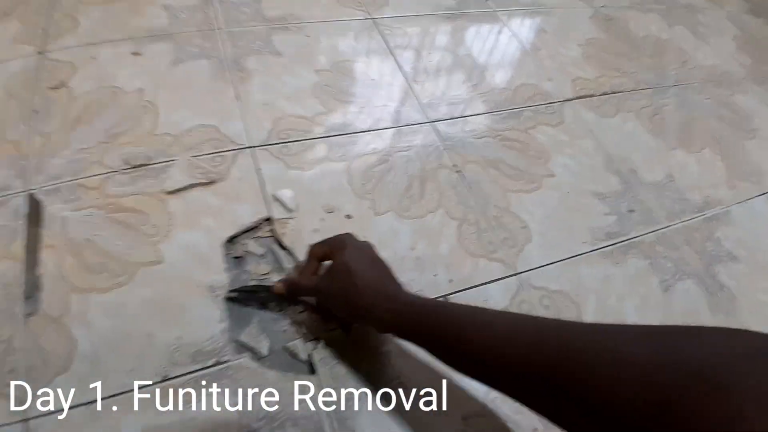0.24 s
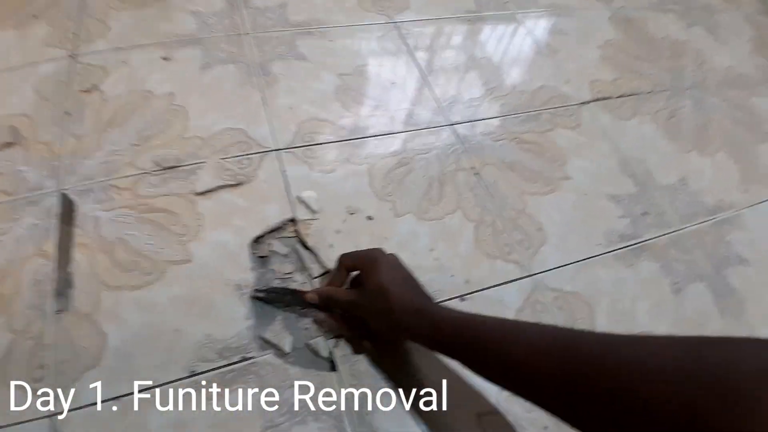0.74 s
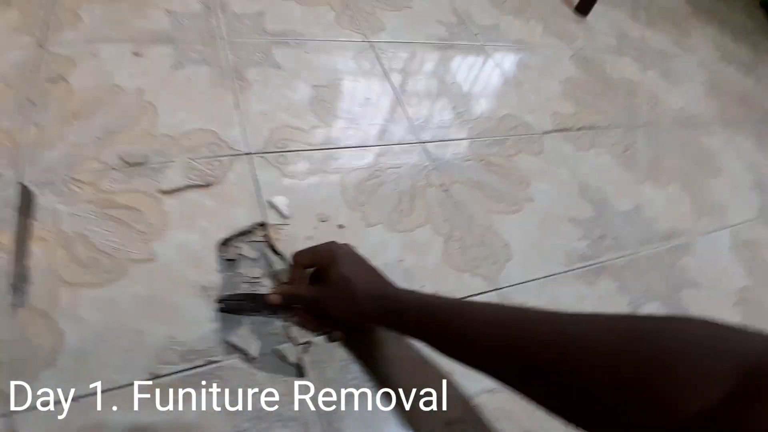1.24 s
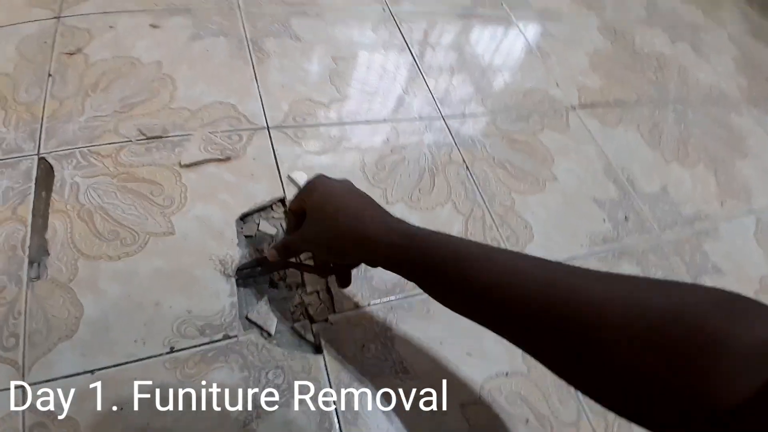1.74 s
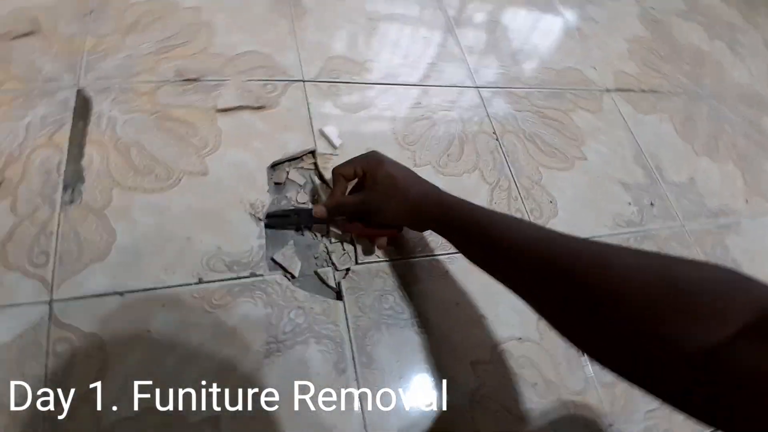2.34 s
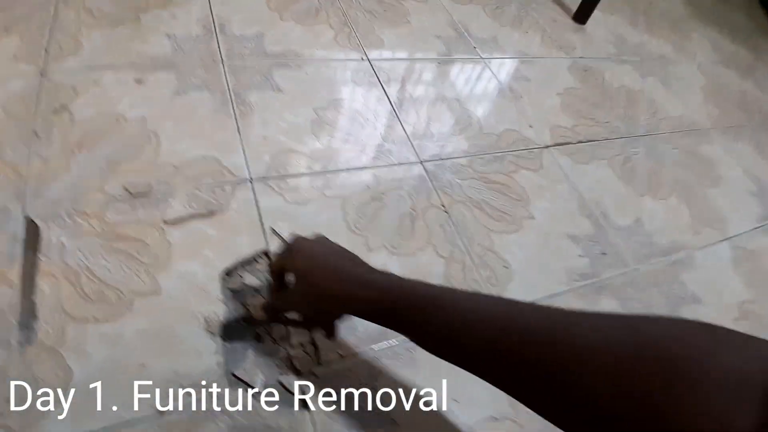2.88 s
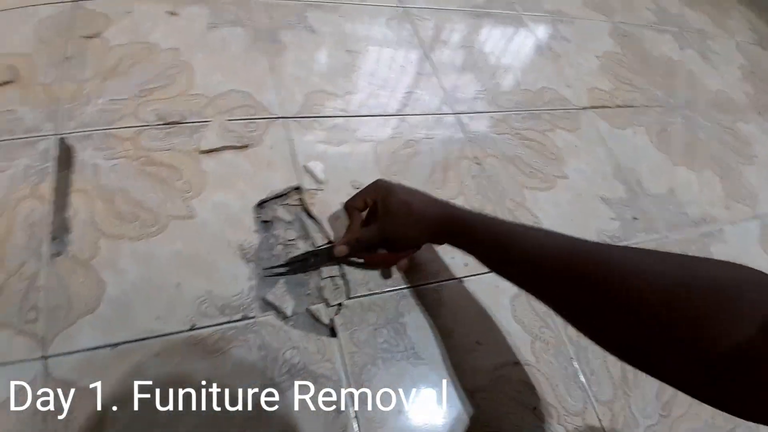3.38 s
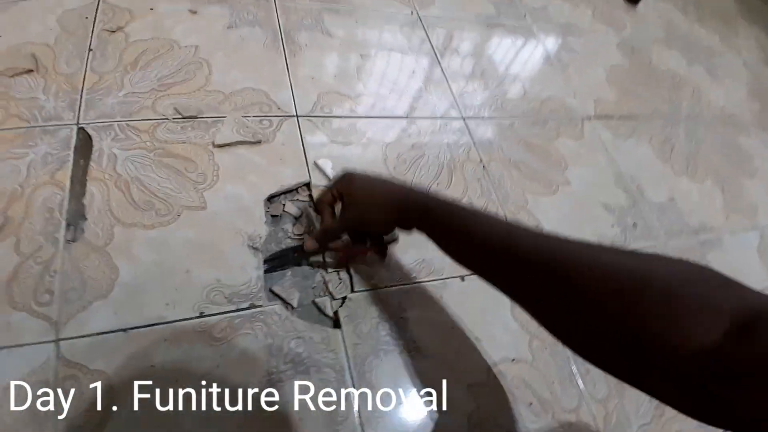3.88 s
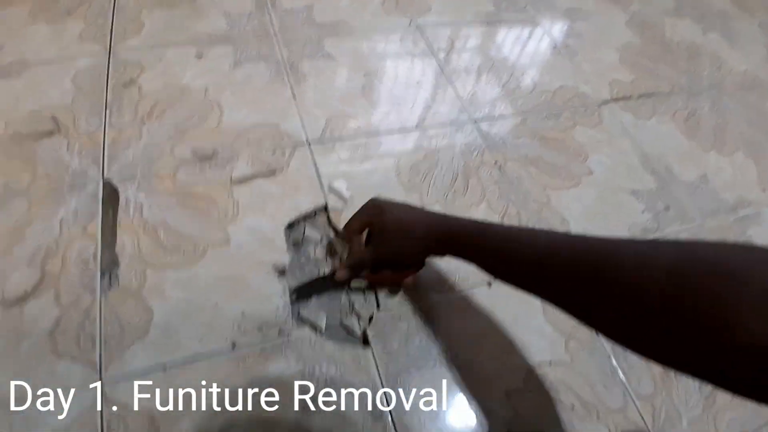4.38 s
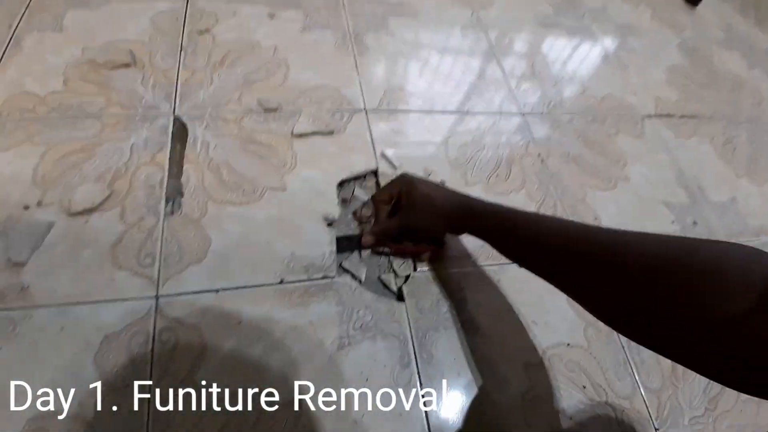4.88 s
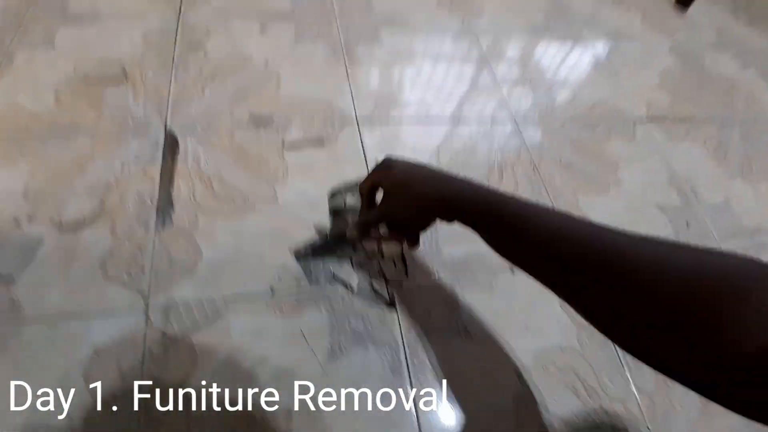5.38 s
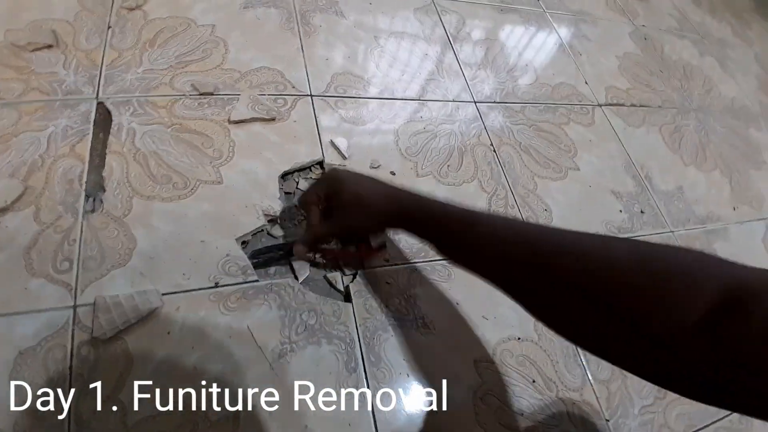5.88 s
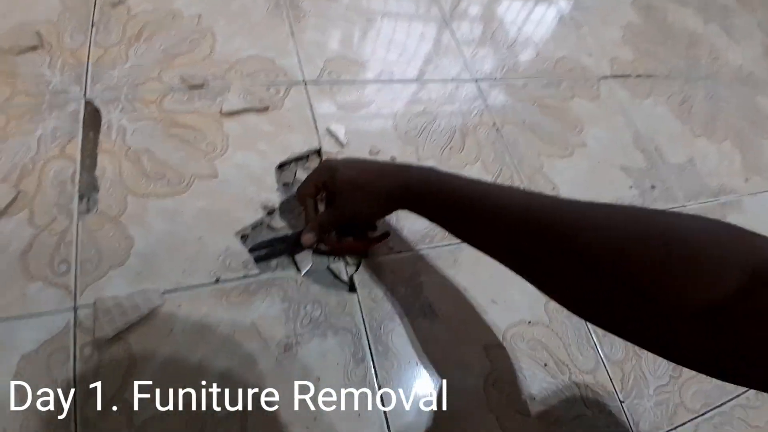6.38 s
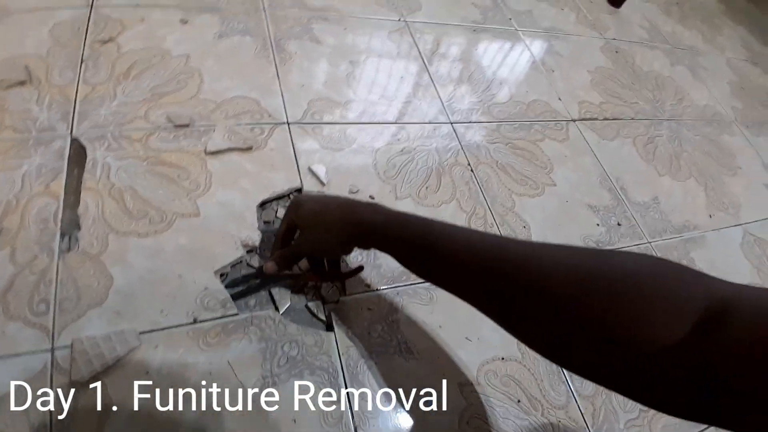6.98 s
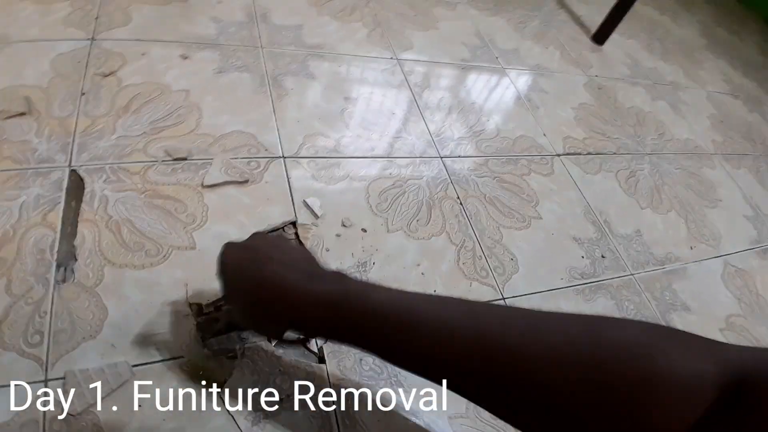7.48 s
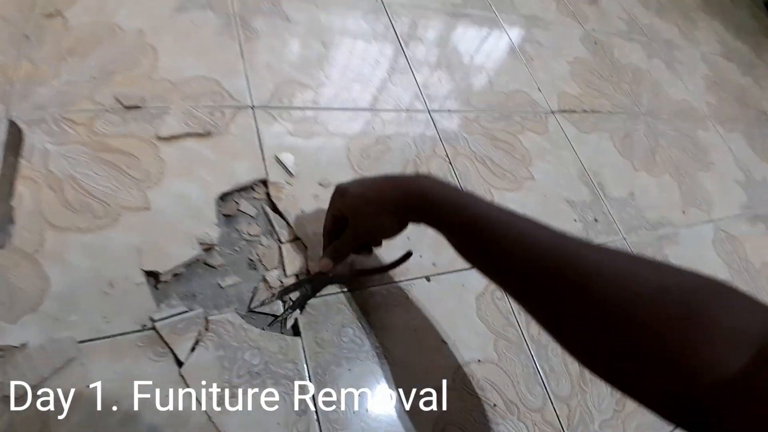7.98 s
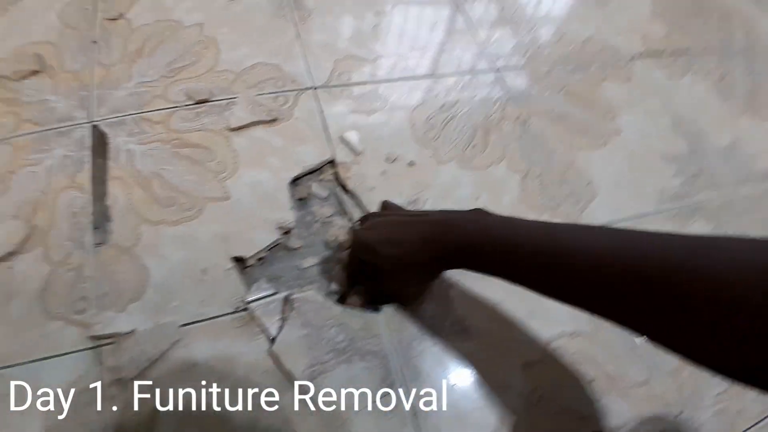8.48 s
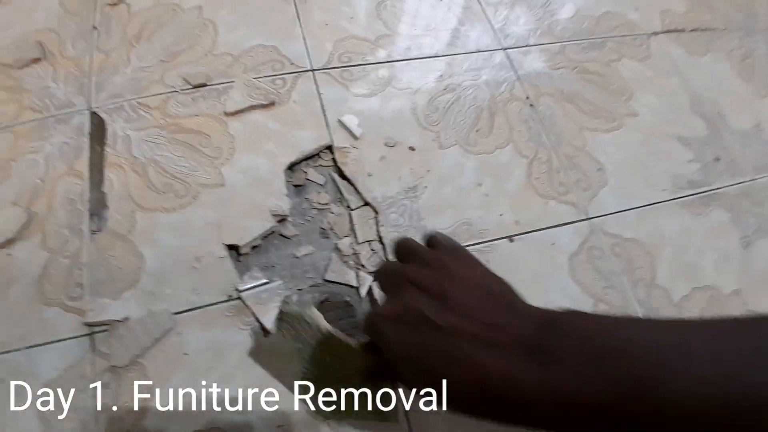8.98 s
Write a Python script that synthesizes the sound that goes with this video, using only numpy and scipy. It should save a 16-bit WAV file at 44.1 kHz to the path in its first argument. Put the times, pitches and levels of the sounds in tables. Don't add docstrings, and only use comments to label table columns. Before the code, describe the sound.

Sharp blows crack hollow-sounding floor tile indoors, gritty scrapes leading into the hits, loose steel ringing briefly, then broken pieces clacking and sliding.

```python
import sys
import numpy as np
from scipy import signal
from scipy.fft import rfft, irfft, next_fast_len
from scipy.io import wavfile

SR = 44100
rng = np.random.default_rng(int(sys.argv[2]) if len(sys.argv) > 2 else 0)


def transcribe(u):
    v = np.clip(np.atleast_2d(u).T, -1, 1)
    q = np.round(v * 32767).astype(np.int16)
    wavfile.write(sys.argv[1], SR, q)


def nominal_scale(level):
    x = np.asarray(level, float) / 20
    return 10 ** x


N = 407484
TOP_HZ = 15380

# frequency in Hz, level in dB, t60 in seconds.
HOLLOW_MODES = [(76.04, -18.5, 0.35), (170, -15, 0.056), (188, 0.5, 0.11), (228.72, -8, 0.01),
                (280.87, 5, 0.073), (345.4, 6.5, 0.0412), (397.4, -0.5, 0.14), (483.8, 7, 0.0349),
                (705, -9.5, 0.032), (809, -7.5, 0.098)]


def at_hz(points, hz):
    point_hz, value = np.transpose(points)
    return np.interp(np.log(hz), np.log(point_hz), value)


def band(x, low_hz, high_hz):
    return signal.sosfilt(signal.butter(2, [low_hz, high_hz], "band", fs=SR, output="sos"), x + 1e-18)


def rms_one(x):
    return x / np.sqrt(np.mean(x ** 2) + 1e-20)


def ring(clicks, hz, t60_s):
    radius, w = nominal_scale(-60 / (t60_s * SR)), 2 * np.pi * hz / SR
    return signal.lfilter([0, np.sin(w)], [1, -2 * radius * np.cos(w), radius ** 2], clicks + 1e-18)


def strike(start_s, level_db, modes, spread_db):
    at = np.round(start_s * SR).astype(int)
    luck = rng.standard_normal((len(at), len(modes)))
    out = np.zeros(N)
    for k, (hz, mode_db, t60_s) in enumerate(modes):
        clicks = np.zeros(N)
        clicks[at] = nominal_scale(level_db + mode_db + spread_db * luck[:, k])
        out += ring(clicks, hz, t60_s)
    return out


def grains(per_s, spread_db):
    sizes = nominal_scale(spread_db * np.minimum(rng.exponential(1, N), 5)) * rng.choice([-1, 1], N)
    return rms_one(sizes * (rng.random(N) < per_s / SR))


def wander(low_hz, high_hz, depth_db):
    return nominal_scale(depth_db * rms_one(band(rng.standard_normal(N), low_hz, high_hz)))


def swells(start_s, level_db, rise_s, fall_s, curve, hold_s=0):
    t = np.arange(0, N, 32)[:, None] / SR
    before = np.maximum(start_s - t, 0) / np.abs(rise_s)
    after = np.maximum(t - start_s - hold_s, 0) / np.abs(fall_s)
    gain = nominal_scale(level_db - 20 * (before + after) ** curve).sum(axis=1)
    return np.interp(np.arange(N) / SR, t[:, 0], gain)


def bank(size, gain):
    # frequency in Hz, left-right correlation.
    likeness = [(60, 0.41), (150, 0.9993), (300, 0.859), (600, 0.061), (1200, 0.063), (4000, 0.32),
                (15000, 0.28)]
    out, edges_hz = 0, 28 * 2 ** np.arange(0, 9.4, .4)
    white = rng.standard_normal((2, 2, size))
    for k, (low_hz, high_hz) in enumerate(zip(edges_hz, edges_hz[1:])):
        mid, side = band(white[k % 2], low_hz, high_hz)
        hz = np.sqrt(low_hz * high_hz)
        alike = at_hz(likeness, hz)
        out = out + gain(hz) * (np.sqrt(1 + alike) * mid + np.sqrt(1 - alike) * side * [[1], [-1]])
    return out


def background():
    # frequency in Hz, density in dB per Hz.
    floor = [(18, -39), (30, -14), (140, -2), (208, -9), (308, -7), (855, -22), (1330, -30), (2310, -26.5),
             (4000, -41.5), (6410, -40), (15600, -46)]
    # peak time in seconds, level in dB, seconds to rise 20 dB (sign ignored).
    booms = [(0.1, -52.5, -5.5), (0.59, -35, 0.68), (1.19, -42.5, 0.34), (1.745, -37, -0.23),
             (3.29, -32.5, .5), (4.01, -46, 0.04), (4.765, -27, 0.0029), (5.11, -14, -0.0118),
             (5.97, -47.5, 0.8), (6.92, -46.5, 0.15), (7.54, -21, 0.215), (8.67, -32.5, 0.27)]
    start_s, level_db, rise_s = np.transpose(booms)
    boom = rms_one(ring(rng.standard_normal(N), 76.0, 0.12))
    noise = nominal_scale(-59) * rms_one(bank(N, lambda hz: nominal_scale(at_hz(floor, hz))))
    return noise + swells(start_s, level_db - 6.0, rise_s, fall_s=0.319, curve=0.8203) * boom


def with_room_feed(x, room_db):
    return x * nominal_scale([[0], [room_db]])


def tool():
    # start in seconds, level in dB.
    hits = [
        (5.3205, -12.5),
        (5.3284, -23.5),
        (5.3987, -14),
        (5.408, -19),
        (5.442, -28),
    ]
    # frequency in Hz, level in dB, t60 in seconds.
    steel_modes = [(739.8, -4.5, 0.038), (2550, -16, .1), (4304, -7, 0.08), (4107, -13.5, .1),
                   (4222, 5, 0.096), (3764, -14.5, .05), (4590, -16.5, 0.055), (6000, -12.5, 0.05),
                   (7500, -14.5, 0.045), (10236, -10.5, 0.04), (11424, -20, 0.027)]
    # start in seconds, length in seconds, rms level in dB.
    jingles = [
        (0.95, 0.46, -54),
        (3.074, 0.19, -46.5),
        (3.19, 0.15, -48),
        (4.614, 0.36, -51.5),
        (5.63, 0.2327, -45.5),
    ]
    # frequency in Hz, level in dB, t60 in seconds.
    joint_modes = [(4730, -10, 0.021), (7824, -4, 0.039), (8500, -4, 0.039), (10200, -1.5, 0.0045),
                   (11380, -5, 0.0045), (12600, -5.5, 0.011), (13780, -6, .01), (15070, -7, .006)]
    start_s, level_db = np.transpose(hits)
    jingle_s, lasts_s, jingle_db = np.transpose(jingles)
    taps = grains(per_s=600, spread_db=2.0)
    jingle = np.zeros(N)
    for hz, db, t60_s in joint_modes:
        some_taps = taps * (rng.random(N) < .6)
        jingle += nominal_scale(db) * wander(9.1, 33, depth_db=4.0) * ring(some_taps, hz, t60_s)
    shaking = swells(jingle_s, jingle_db - 9.0, .02, .02, 0.963, lasts_s)
    rings = strike(start_s, level_db - 0.5, steel_modes, spread_db=1.5)
    return with_room_feed(rings + shaking * rms_one(jingle), -2)


def strokes():
    # end in seconds, grind in dB, seconds for the last 20 dB
    # (sign ignored), rumble and hiss in dB re grind.
    pushes = [
        (1.157, -39.5, 0.1045, 5, -1),
        (1.725, -25, -0.0368, 1.5, 0.5),
        (3.486, -17.5, -0.0243, 0, 4.5),
        (3.996, -26, 0.017, 7.5, -3),
        (4.742, -22, -0.035, 7, -10.5),
        (5.93, -35, 0.0943, 0.5, 3),
        (7.419, -24.5, 0.0252, 7.5, -5),
    ]
    # peak in seconds, grind in dB, seconds to fall 20 dB
    # (sign ignored), rumble and hiss in dB re grind.
    crumbles = [
        (0.545, -30, 0.0852, 3, -15.5),
        (0.901, -50, -0.01, 5, 0),
        (1.79, -31.5, 0.1629, 8.5, -15),
        (2.746, -35.5, 0.193, 0, -1),
        (2.946, -41, 0.2839, 4, -2.5),
        (4.033, -18, 0.213, -2.5, -5),
        (5.114, -24.5, 0.36, -1, -10),
        (7.47, -25.5, 0.2344, 10.5, 0),
        (7.75, -46, 0.4147, 5.5, -5.5),
        (8.315, -51, 1, 8.5, -2),
    ]
    # peak in seconds, grind in dB, seconds to rise and to fall 20 dB (signs ignored),
    # rumble in dB re grind.
    slides = [
        (0.086, -49.5, 5, -0.3033, -3),
        (0.475, -37, 0.2, 0.05, -1.5),
        (2.004, -28.5, -0.0776, 0.0543, -4),
        (2.408, -53, 0.32, -0.05, -9.5),
        (2.69, -56, 0.04, 0.11, 4),
        (3.981, -43.5, 0.2379, -0.24, 2),
        (6.922, -52.5, 0.0409, 0.1365, 15.5),
        (7.401, -44.5, 0.147, 0.1469, 15),
        (9.2, -42.5, 1.23, 4.5, -3.5),
    ]
    # start in seconds, length in seconds,
    # grind in dB, rumble and hiss in dB re grind.
    drags = [(0.442, 0.0515, -35.5, 5, 2.5), (1.153, 0.02677, -38.5, 2.5, 0.5), (1.65, 0.074, -55, 4.5, -5),
             (1.706, 0.028, -34.5, 5.5, 3.5), (2.716, 0.016, -46, 9.5, -6), (3.441, 0.041, -46.5, 7, 8),
             (5.895, 0.043, -49.5, 6.5, 3.5), (7.382, 0.019, -38, -10.5, 5), (9.188, .06, -48, 3, -13),
             (7.298, 0.018, -39, 10.5, -8.5), (1.976, 0.0293, -36.5, -2.5, -4.5),
             (2.384, 0.0417, -44.5, -3, -3.5), (2.735, 0.031, -39, 6.5, -3),
             (2.819, 0.0145, -43.5, 6.5, -5.5), (3.065, 0.0217, -45.5, 6, -1),
             (4.711, 0.0155, -50.5, 2.5, -1), (4.729, 0.009, -43.5, 3, -7.5),
             (8.296, 0.0112, -42, 10.5, -11.5), (8.34, 0.05, -45, 8, -9.5), (8.402, 0.0406, -42.5, 10, -10),
             (8.52, 0.0245, -43, 10, -13.5), (8.611, .02, -37, 5.5, 0), (8.645, 0.0203, -44.5, 3.5, 2.5),
             (8.699, 0.029, -42, 3, -0.5), (8.835, 0.051, -47.5, 9.5, 2), (8.933, 0.0224, -45, 8, -11.5),
             (9.032, .06, -49.5, 6.5, -4)]
    push_s, push_db, push_rise_s, push_rumble_db, push_hiss_db = np.transpose(pushes)
    crumble_s, crumble_db, crumble_fall_s, crumble_rumble_db, crumble_hiss_db = np.transpose(crumbles)
    slide_s, slide_db, slide_rise_s, slide_fall_s, slide_rumble_db = np.transpose(slides)
    drag_s, drag_lasts_s, drag_db, drag_rumble_db, drag_hiss_db = np.transpose(drags)
    offsets_db = [
        (0, 0, 0, 0),
        (push_rumble_db, crumble_rumble_db, slide_rumble_db, drag_rumble_db),
        (push_hiss_db, crumble_hiss_db, -4, drag_hiss_db),
    ]
    return [swells(push_s, push_db + push, push_rise_s, fall_s=0.003, curve=0.5182)
            + swells(crumble_s, crumble_db + crumble, 0.0361, crumble_fall_s, curve=1.046)
            + swells(slide_s, slide_db + slide, slide_rise_s, slide_fall_s, curve=1.046)
            + swells(drag_s, drag_db + drag, 0.0032, 0.004, 0.84, drag_lasts_s)
            for push, crumble, slide, drag in offsets_db]


def grinding():
    grind_gain, rumble_gain, hiss_gain = strokes()
    clumps = wander(18.7, 77, depth_db=2.5)
    grit = clumps * grains(per_s=4000, spread_db=3.0)
    pieces = np.zeros(N)
    for hz in np.geomspace(1400, 4500, 7):
        pieces += wander(14, 25, depth_db=1.5) * ring(grit, hz, 3.91 / hz)
    grind = rms_one(rms_one(band(grit, 1400, 3912)) + 1.2 * rms_one(pieces))
    shaken = rms_one(sum(nominal_scale(db) * ring(grit, hz, 0.43 * t60_s) for hz, db, t60_s in HOLLOW_MODES[2:8]))
    tumbling = rms_one(band(clumps * grains(per_s=1500, spread_db=2.5), 297.5, 1020.5))
    hiss = rms_one(band(clumps * grains(per_s=5700, spread_db=5.0), 6600, TOP_HZ))
    pressure = np.clip((20 * np.log10(grind_gain) + 48.32) / 26, .15, .95)
    rumble = pressure * shaken + np.sqrt(1 - pressure ** 2) * tumbling
    return with_room_feed(nominal_scale(-6.0) * (grind_gain * grind + rumble_gain * rumble + hiss_gain * hiss), -2.5)


def clinks(rows, t60_s):
    out, t = np.zeros(N), np.arange(SR // 5) / SR
    for start_s, level_db, hz in rows:
        start, t60 = round(start_s * SR), t60_s * (hz / 1000) ** .05
        chime = nominal_scale(level_db - 60 * t / t60) * np.sin(2 * np.pi * hz * t)
        out[start:start + len(t)] += chime[:N - start]
    return out


def shards():
    # start in seconds, level in dB, pitch in Hz.
    loose = [(.524, -14, 2750), (1.165, -35.5, 3446), (1.727, -13.5, 4660), (1.73, -10.5, 925),
             (3.44, -45.5, 4930), (3.49, -17.5, 3650), (3.512, -45, 3502), (4.002, -9.5, 2086),
             (4.01, -9, 4560), (4.03, -10, 4200), (4.08, -11, 4580), (4.095, -15, 4130),
             (4.065, -11.5, 2154), (4.09, -15, 2270), (4.04, -8, 2550), (4.055, -12, 4380),
             (4.745, -19, 1550), (4.746, -17.5, 2285), (4.748, -19.5, 998), (5.095, -14, 400),
             (1.162, -20, 289), (1.163, -27, 895), (3.492, -16, 792), (7.428, -13, 1047), (.53, -16.5, 279),
             (4.746, -38, 3106), (5.932, -20, 3735), (5.929, -30.5, 2650), (5.945, -17, 585.2),
             (5.949, -22.5, 3316), (5.95, -27, 1971), (6.833, -45, 3197), (6.889, -21, 598),
             (6.9, -35.5, 4440), (7.2, -27.5, 8000), (7.421, -17, 8500), (7.657, -14.5, 789.5),
             (7.797, -25, 756.3), (8.69, -23.5, 1765), (8.698, -36.5, 3800), (8.85, -30, 8690),
             (9.189, -44, 3000), (9.2, -35.5, 1969), (7.701, -12.5, 799), (7.767, -17, 866),
             (7.795, -25.5, 5980), (7.795, -26, 10140), (8.434, -24, 680), (8.515, -15, 891),
             (8.718, -26.5, 3826), (8.92, -23.5, 8900), (8.952, -19, 586), (9.001, -34.5, 616.3),
             (9.222, -27, 1500)]
    # start in
    # seconds, level in dB, pitch in Hz.
    close_rings = [(1.159, -26, 3500), (2.539, -49, 5923), (2.667, -45.5, 5020), (2.71, -39, 5480),
                   (2.948, -28, 3790), (2.95, -40, 7300), (2.96, -33, 1110), (7.657, -26.5, 4100),
                   (7.658, -30, 2820), (7.925, -35, 895.5), (5.321, -14.5, 4222), (5.33, -13, 4222),
                   (5.452, -27.5, 11300), (5.42, -30, 10100), (8.516, -17.5, 1530), (8.955, -26, 1606),
                   (8.584, -30.5, 800), (8.812, -35.5, 700), (2.05, -22, 380), (2.058, -27, 420),
                   (3.974, -32, 751.6), (5.399, -13.5, 4222), (5.409, -12, 4173), (5.417, -17, 4222),
                   (5.45, -23, 4340), (5.51, -23.5, 4200), (9.19, -34, 4600)]
    # start in seconds, level in dB, pitch in Hz.
    singing = [
        (7.98, -43, 3180),
        (8.04, -37, 3183),
        (8.07, -42, 3143),
        (8.13, -44.5, 3234),
        (8.2, -52.5, 3173),
    ]
    # start in seconds, level in dB, pitch in Hz.
    glaze_snaps = [(.581, -11, 6500), (.586, -22.5, 4000), (.647, -15, 5561), (1.771, -10, 3010),
                   (1.773, -23, 6000), (1.803, -21, 6000), (1.989, -32.5, 6965), (3.487, -6.5, 1120),
                   (3.488, -10, 2510), (3.488, -8, 4660), (3.488, -17, 9000), (3.886, -30.5, 5060),
                   (3.887, -37.5, 8500), (4.0, -12, 6000), (5.32, -14.5, 3000), (5.32, -20.5, 7000),
                   (5.329, -20, 6000), (5.399, -15.5, 4480), (7.953, -27.5, 5256), (8.036, -26.5, 6240),
                   (4.748, -17.5, 1802), (5.4, -14, 7500), (5.408, -17, 6500), (5.415, -20, 8000),
                   (5.745, -37.5, 6500), (5.755, -35.5, 6000), (7.2, -33, 6530), (7.207, -26.5, 1010),
                   (7.313, -21.5, 6860), (7.425, -3.5, 1000), (7.494, -18, 450), (7.658, -9.5, 905),
                   (7.703, -18.5, 910.3), (7.796, -20, 4240), (8.517, -18, 1095), (8.692, -25.5, 2500)]
    return (with_room_feed(clinks(loose, 0.0213), -5.5)
            + with_room_feed(clinks(close_rings, 0.0213), -9)
            + with_room_feed(clinks(singing, 0.087), -6.5)
            + with_room_feed(clinks(glaze_snaps, 0.0069), -14.5))


def all_contacts():
    # start in seconds, crack in dB, knock and snap in dB re crack, knock pitch in Hz.
    blows = [(0.1523, -18, -7.5, 1.5, 783), (0.5209, -8, -1, -12, 1198), (0.5811, -8.5, -12, -5, 313.7),
             (1.1574, -20, 0.5, -8, 175.4), (1.7257, -10.5, -8, -8.5, 297), (3.486, -19, 10.5, -12, 302),
             (4, -12, -1.5, -3.5, 286), (4.7433, -26.5, 15, -8.5, 824.5), (5.088, -7.5, -7, -27.5, 256.7),
             (5.93, -15.5, 6, -13.5, 639), (5.948, -25.5, 6.5, -4.5, 498), (3.492, -24, 0.5, -9, 290),
             (1.732, -19, 5.5, -10.5, 542), (7.3126, -22.5, 0.5, -9, 265.8), (7.418, -15, 3, -0.5, 714),
             (7.42, -14.5, 4, -11.5, 276.3)]
    # start in seconds, crack in dB, knock and snap in dB re crack.
    thuds = [(0.045, -48.5, 11, -15.5), (0.0899, -46, 5, -13.5), (0.644, -32, 3.5, 7),
             (1.7708, -15, -16.5, -6), (1.798, -19, -10, -2), (2.3815, -37.5, -4, -9.5),
             (2.5381, -51.5, -11, 5), (2.732, -27, -7.5, -31), (2.8059, -45, 12, -9.5),
             (3.077, -35.5, -5, -0.5), (4.151, -24.5, 3, -3.5), (4.7605, -38.5, 13, -18.5),
             (6.861, -58.5, 15, 15.5), (6.896, -36, 5.5, -9.5), (7.0074, -54.5, -0.5, 11),
             (7.1032, -33.5, -9, -11.5), (7.493, -10.5, -3.5, -26.5), (7.8629, -42.5, 5.5, -10),
             (8.2953, -30.5, -5, -11), (8.919, -22.5, -5.5, 0)]
    # start in seconds, crack in dB, knock and snap in dB re crack.
    clacks = [(0.4692, -25.5, 4.5, -22), (0.4954, -34.5, 17, 7.5), (1.713, -36.5, -1, -2),
              (1.9877, -29.5, -4, -0.5), (2.3294, -37, -1, -5.5), (2.7709, -31, 8.5, -19.5),
              (2.946, -31.5, -11.5, 2), (3.975, -35.5, 2.5, -8.5), (5.0758, -10.5, -4.5, -2.5),
              (7.199, -32, -2.5, -0.5), (7.296, -38, 12, -4), (7.406, -27.5, 11, -7.5),
              (7.4797, -10, -0.5, -8), (7.487, -13, -5, -6.5), (7.654, -20.5, 6.5, -11),
              (7.702, -28.5, 10, -12.5), (7.7939, -31, 8.5, -11), (8.038, -35.5, 3.5, 1.5),
              (8.3314, -49, 22.5, -5.5), (8.4128, -44, 9.5, -13.5), (8.6084, -32, 0.5, -3.5),
              (8.6872, -27.5, -7.5, -5.5), (8.404, -40.5, 6, -7), (8.496, -42.5, 9, -8.5),
              (8.652, -36.5, 8, -11.5), (8.749, -48, 7.5, -9.5), (8.862, -43.5, 8, -10.5),
              (8.881, -38.5, 11, -7), (8.9551, -50, -8, -12), (8.9995, -37.5, 13.5, 11.5),
              (9.2215, -44.5, 5, -11)]
    # start in seconds, crack in dB, snap in dB re crack.
    ticks = [(0.404, -49, 8.5), (0.452, -36.5, 12.5), (1.0231, -45, 3.5), (1.057, -57.5, 2.5),
             (1.1347, -47.5, 11.5), (1.468, -66.5, 5), (1.557, -70, 7.5), (1.62, -60.5, 6.5),
             (1.639, -56.5, 8), (1.826, -38, 2), (2.603, -41.5, -9), (2.668, -54, 6), (2.709, -50.5, 7.5),
             (3.29, -51, 5), (3.331, -54, 6.5), (3.401, -67.5, 9.5), (3.5372, -42.5, -26.5),
             (3.885, -43, 9), (4.6137, -55, 3.5), (4.657, -50, 3.5), (5.0555, -57, -9.5),
             (5.3199, -15.5, -30.5), (5.3283, -17.5, -30), (5.399, -13, -5.5), (5.743, -43.5, 1.5),
             (5.7548, -45.5, -7.5), (6.5301, -61.5, 7), (6.6047, -54, -6.5), (6.7335, -47, -37.5),
             (6.833, -46, -27), (7.113, -44, -3.5), (7.449, -21.5, 2), (7.7679, -22, -8.5),
             (7.8868, -37, 4.5), (7.954, -32.5, -1.5), (8.4333, -39.5, -4.5), (8.5165, -34, -10),
             (8.7182, -35, 1.5), (9.141, -46.5, -4)]
    rows = [(*row, 6.72 + 0.3744 * row[2], 0) for row in blows]
    rows += [(*row, 307.8, 4.46, 0) for row in thuds]
    rows += [(*row, 680, 5.23, -0.5) for row in clacks]
    rows += [(start_s, crack_db, -18, snap_db, 700, 4.46, 2) for start_s, crack_db, snap_db in ticks]
    return sorted(rows)


def contacts():
    start_s, crack_db, knock_db, snap_db, knock_hz, crunch_ms, room_db = np.transpose(all_contacts())
    crack, snap, knock = np.zeros((3, 2, N))
    t, grit = np.arange(SR // 10) / SR, grains(per_s=9000, spread_db=4.5)
    for k, start in enumerate(np.round(start_s * SR).astype(int)):
        span = slice(start, min(start + len(t), N))
        age = t[:N - start] / (crunch_ms[k] / 1000)
        burst = (1 - np.exp(-age / 0.1843)) * np.exp(-age) * grit[span]
        crack[0, span] += nominal_scale(crack_db[k]) * burst
        snap[0, span] += nominal_scale(crack_db[k] + snap_db[k]) * burst
        strength = np.linalg.norm(burst)
        crack[1, start] = nominal_scale(crack_db[k] + room_db[k] - 2.0) * strength
        snap[1, start] = nominal_scale(crack_db[k] + snap_db[k] + room_db[k] + 0.5) * strength
        cycles = np.maximum(t - .0015, 0) * knock_hz[k]
        envelope = (1 - np.exp(-cycles / .4)) * np.exp(-(cycles / 2.785) ** 2)
        swing = nominal_scale(crack_db[k] + knock_db[k]) * np.sin(2 * np.pi * cycles) * envelope
        knock[:, span] += with_room_feed(swing[:N - start], room_db[k] - 5.5)
    heavy_db = -13 - 9 * np.maximum(np.log2(knock_hz / 280), 0)
    hollow = strike(start_s + .002, crack_db + knock_db + heavy_db, HOLLOW_MODES, spread_db=2.5)
    crunch = nominal_scale(10.5) * band(crack, 430, 4403) + nominal_scale(5.5) * band(snap, 2400, TOP_HZ)
    return crunch + nominal_scale(1.0) * knock + hollow


def far_port(x):
    low = signal.sosfilt(signal.butter(1, 3500, fs=SR, output="sos"), x)
    high, scatter = x - low, 0.5504
    for lag in (3, 8, 13):
        gap = np.zeros(lag - 1)
        high = signal.lfilter([-scatter, *gap, 1], [1, *gap, -scatter], high + 1e-18)
    return np.roll(low, 7) + high


def room(near, sent):
    # frequency in Hz, t60 in seconds.
    room_t60 = [(60, 0.962), (130, 0.827), (350, 0.551), (920, 0.616), (2430, 0.605), (6400, 0.5826),
                (15000, 0.194)]
    # frequency in Hz, level in dB.
    colour = [(60, -7), (250, -2), (700, -0.5), (1500, -2), (3000, -0.75), (4300, -3), (5300, -2.5),
              (9000, -1.5), (15000, -10)]
    t = np.arange(SR) / SR
    tail = bank(SR, lambda hz: nominal_scale(at_hz(colour, hz) - 60 * t / at_hz(room_t60, hz)))
    build_up = np.clip((t - .005) / .009, 0, 1)
    late_loss = nominal_scale(-24 * t * t)
    tail = tail * build_up * late_loss
    tail = nominal_scale(-2) * tail / np.sqrt(np.sum(tail ** 2) / 2)
    direct = np.stack([near, far_port(near)])
    return direct + signal.fftconvolve(sent[None], tail, axes=1)[:, :N]


def ports(x):
    # frequency in Hz, left minus right in dB.
    balance = [(40, 2), (125, 0), (250, -3.5), (500, -0.5), (1500, -1.5), (5000, 0.5), (12000, .5)]
    size = next_fast_len(N)
    lean_db = at_hz(balance, np.arange(1, size // 2 + 2) * SR / size) / 2
    return irfft(rfft(x, size) * nominal_scale(lean_db * np.array([[1], [-1]])), size)[:, :N]


def scene():
    near, sent = tool() + grinding() + shards() + contacts()
    left_db = 1.34
    return ports(room(near, sent) + background()) * nominal_scale([[left_db / 2], [-left_db / 2]])


def roll_off(x):
    return signal.sosfilt(signal.butter(12, 16970, fs=SR, output="sos"), x)


def record(dry):
    thin = signal.sosfilt(signal.butter(3, 60, "high", fs=SR, output="sos"), dry)
    rounded = .9 * np.tanh(thin / .9)
    shelved = signal.sosfilt(signal.cheby2(12, 22, 16050, fs=SR, output="sos"), rounded)
    mix = signal.sosfilt(signal.cheby2(18, 60, 17000, fs=SR, output="sos"), shelved)
    return roll_off(mix)


dry = scene()
out = record(dry)
transcribe(out)
```